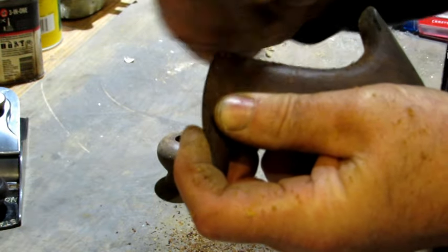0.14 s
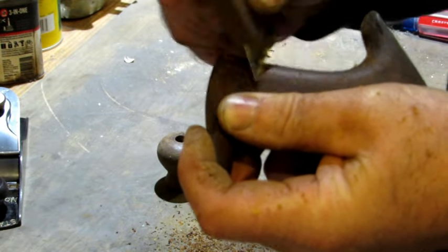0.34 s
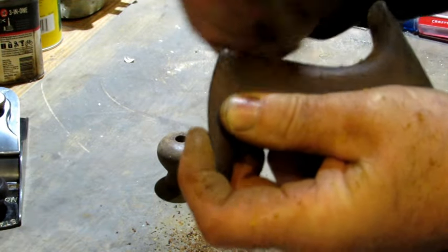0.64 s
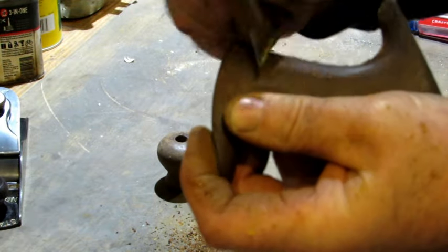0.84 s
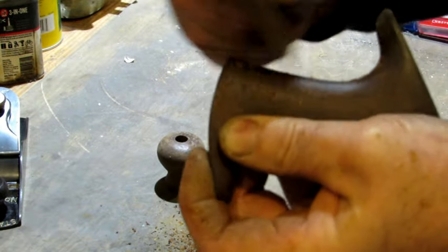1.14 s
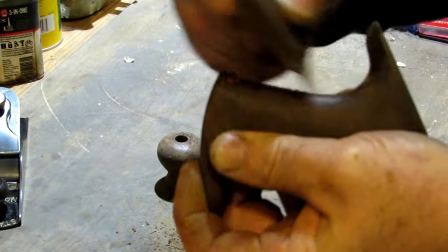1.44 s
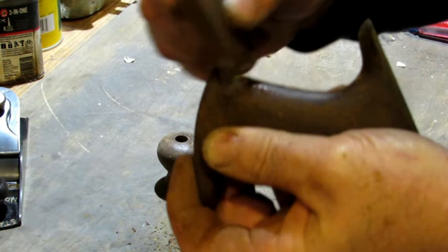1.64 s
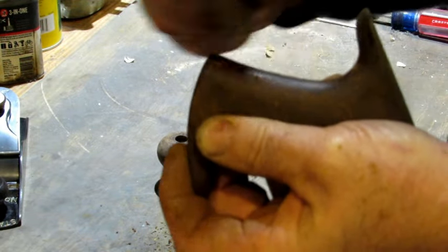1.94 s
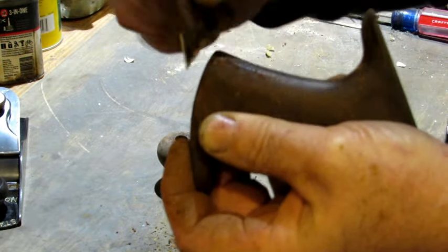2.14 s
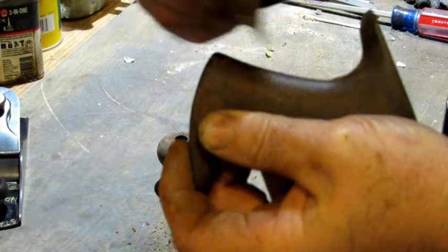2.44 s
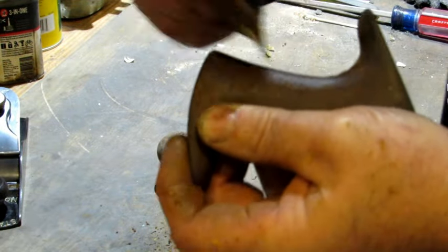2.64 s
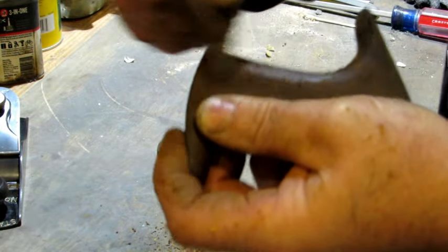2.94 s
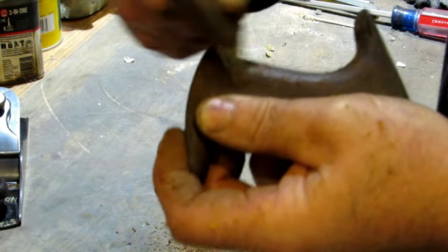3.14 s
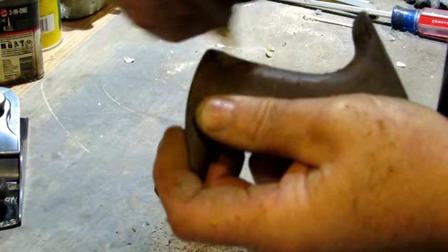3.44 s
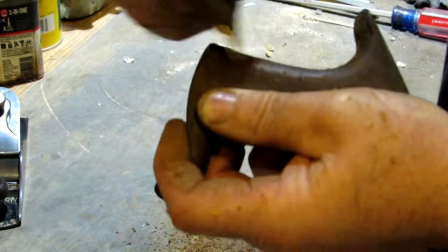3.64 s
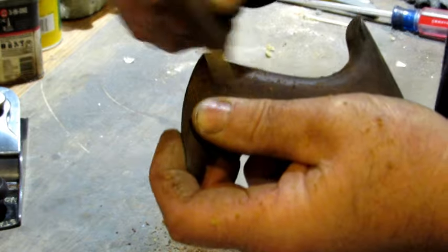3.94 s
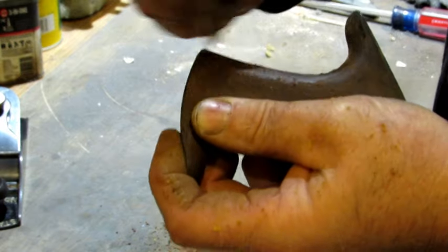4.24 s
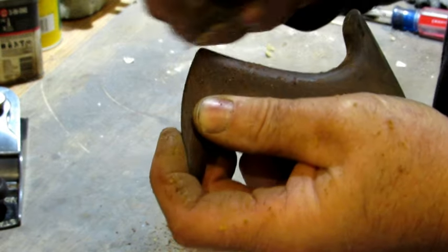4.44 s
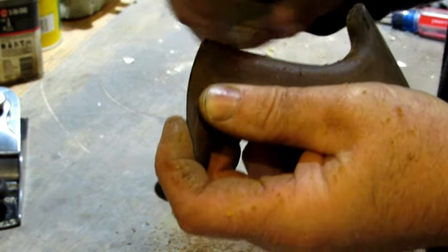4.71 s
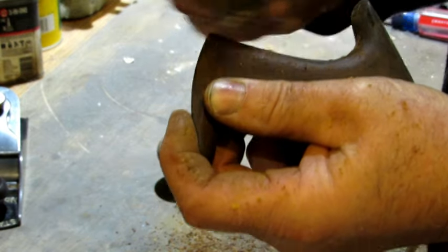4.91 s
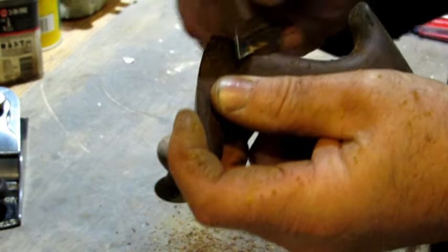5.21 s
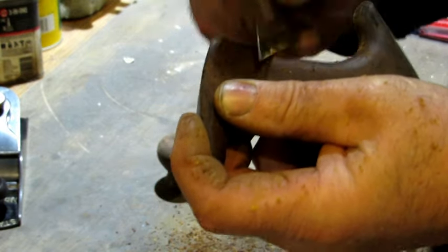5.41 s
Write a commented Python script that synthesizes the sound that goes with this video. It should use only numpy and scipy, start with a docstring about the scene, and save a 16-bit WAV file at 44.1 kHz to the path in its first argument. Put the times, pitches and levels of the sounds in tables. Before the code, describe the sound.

Close stereo view of a small steel blade scraping a wooden handle held in the hand. A scrape opens at once, then each stroke begins with a light woody tap, a faint drag and a gritty rasp that swells and stops. Strokes come about four a second, later nearly five and shorter. Steady bass-heavy room noise and a short workshop tail surround them.

```python
"""A small steel blade scrapes finish off a hand-held wooden handle, heard close by in a workshop.
Steady, wide room noise, heaviest in the bass, runs throughout. The first scraping stroke opens the scene.
Before each later stroke the blade lands with a tap and its quick echo off the bench: short forces excite
modes of wood and steel. Then the edge drags, bites and tears chips: tiny random slips swell and ring blade
and wood, and at times it catches with a click. The shop answers strokes and taps with a short diffuse tail."""
import sys
import numpy as np
from scipy import signal
from scipy.fft import rfft, irfft, next_fast_len
from scipy.io import wavfile
from scipy.ndimage import uniform_filter1d, map_coordinates

SR = 44100
rng = np.random.default_rng(int(sys.argv[2]) if len(sys.argv) > 2 else 0)


def digitize_waveform(pressure):
    """Quantize a signal to 16-bit integers and store it at the path in sys.argv[1].

    Rows of a 2-D input are taken as channels; values are limited to [-1, 1].
    """
    field = np.atleast_2d(pressure).T
    bounded = np.clip(field, -1, 1)
    quanta = np.round(bounded * 32767).astype(np.int16)
    wavfile.write(sys.argv[1], SR, quanta)


N = 245548

# Resonances of the wooden handle and the steel blade; BLADE rows 0-4 are its body, the rest its edge.
# Both: (frequency [Hz], width [Hz], relative level scraped [dB], relative level tapped [dB])
HANDLE_MODES = [(517, 96, -12, -17), (637, 40.4, -7, 3), (767, 44.6, -4, 2.5), (864, 42, -2, 8),
                (979, 107, -5, 7.5), (1148, 65, -2.5, -8), (1374, 99, -1.5, 2.5), (1702, 166, 4, 7),
                (2024, 227, 4, 13), (2038, 102, 1, -9), (2325, 220, 0.5, 1.5), (2426, 148, 4, 5),
                (2854, 380, -4, 11), (3287, 90, 4.5, 18), (3910, 790, -1, -31)]
BLADE_MODES = [(4860, 500, -14, 7), (5550, 1620, -2, -43), (6570, 1010, 1.5, 7), (7670, 1000, 1.5, 9),
               (8420, 680, 1, -1), (7980, 290, -12, -55), (9180, 850, -6, 10.5), (10313, 990, 5, 16.5),
               (10320, 750, 1, -1), (12230, 1100, -5.5, 11.5), (14800, 490, -9, -45.5)]
# The flexed blade sings while it cuts: (frequency [Hz], width [Hz], level [dB])
SQUEAL_MODE = [(2568, 93, 0)]
# Scraping strokes: (end of bite [s], time to peak [s], length from bite to lift-off [s],
#   drag, bite under the peak [dB], peak hiss [dB], start of lift-off under the peak [dB];
#   against the peak: blade body [dB], hollow wood [dB], step of hollow wood at the peak [dB],
#   stiff wood [dB], squeal [dB])
STROKES = [(0.02, 0.04, 0.09, -15, -7.5, -20.5, -7, -2.0, -12, 7, -11.5, -23),
           (0.289, 0.055, 0.092, -28.5, -7.0, -19.5, -10.5, -5.5, -15, 7, -15, -23),
           (0.535, 0.058, 0.097, -26, -8.5, -20.5, -15, -4, -15, 3.5, -12.5, -19),
           (0.766, 0.049, 0.097, -29, -12, -20.5, -10, -1.5, -18, -3.5, -13.5, -22),
           (1.029, 0.028, 0.08, -16, -12.5, -24, -8.5, -1.5, -16.5, 2, -10, -14),
           (1.258, 0.058, 0.11, -34, -10.5, -26, -6, -3.0, -13.5, 2.5, -10.5, -19),
           (1.544, 0.045, 0.094, -23, -11, -23.5, -12, -3, -17.5, 0.5, -15, -17.5),
           (1.796, 0.052, 0.1, -28, -8.5, -25, -5.5, -2, -14.5, 1, -12.0, -19),
           (2.07, 0.036, 0.082, -16, -9.5, -28.5, -0.5, -3, -7.5, 3, -9, -19),
           (2.319, 0.033, 0.084, -31, -7, -28.0, -6, -6, -11.0, 1.5, -9, -15),
           (2.538, 0.035, 0.069, -17, -15.5, -22, -10.5, -5.5, -18.5, -7, -11.0, -17),
           (2.748, 0.03, 0.06, -20, -9, -20, -8.5, -8.0, -21.5, -7, -12.0, -13),
           (2.954, 0.018, 0.041, -16.5, -12.5, -15, -12.5, -4.5, -22.5, -7, -16.5, -16),
           (3.162, 0.028, 0.066, -19, -9.5, -21.5, -12.5, -4, -16.5, -5, -13.5, -17.5),
           (3.372, 0.026, 0.049, -20, -0.5, -24.0, -7.0, -4.5, -15.5, -2, -11.5, -19),
           (3.559, 0.015, 0.056, -32, -3, -24.5, -5.5, -5, -15, -0.5, -13.5, -15),
           (3.76, 0.025, 0.045, -28, -3.5, -28.5, 0, -8.5, -13.5, -5, -8.5, -15),
           (3.947, 0.062, 0.054, -32, -4.0, -26.5, -5.0, -5.0, -10, -2.5, -7.5, -12.5),
           (4.151, 0.018, 0.058, -24, -15, -24, -7.5, -8.5, -15.5, -1, -15.5, -16),
           (4.367, 0.041, 0.063, -40, -2, -26.0, -4.5, -6.0, -15.5, -2, -13.5, -15),
           (4.583, 0.024, 0.062, -24, -12, -24, -6.5, -4.5, -14.5, -3, -15, -13.5),
           (4.796, 0.016, 0.061, -35, -8, -27, -5.0, -7.5, -14.0, 3, -13.5, -10.0),
           (5.008, 0.021, 0.064, -29, -14, -28, -5, -1.5, -13, -1, -11.5, -16.0),
           (5.236, 0.021, 0.06, -28, -3.5, -32.5, -4.0, 0, -12, 0, -10, -16.0),
           (5.459, 0.044, 0.059, -23, -6, -23, -8.5, -4.5, -17.5, -2, -13.5, -19.0)]
LEAD_S, BITE_S, LIFT_S = 0.033, 0.0056, 0.015  # light drag before the bite, the bite, the lift-off
LIFT_DB = -17.5  # fall during the lift-off
BODY_RISE_DB, STIFF_RISE_DB, SQUEAL_RISE_DB = 6.5, -1, -2  # change of each voice from bite to lift
WOOD_FOLLOWS = 0.26  # the wood swings by this share of the hiss's dB
DIG_S = 0.0064  # the edge digs deeper or rides up after the peak: the hollow wood changes within this time


def scrape():
    """Friction excitation: while the edge is on the wood, its slips drive the modes of edge, blade and handle."""
    t = np.arange(N) / SR
    gains = np.zeros((5, N))
    for (s, rise_s, length_s, drag_db, bite_db, peak_db, lift_db,
         body_db, hollow_db, hollow_rise_db, stiff_db, squeal_db) in STROKES:
        start = s - BITE_S - LEAD_S
        lift = s + length_s
        end = lift + LIFT_S
        on = (t >= start) & (t < end + .02)
        now = t[on]
        swing_db = np.interp(now, [s - BITE_S, s, s + min(rise_s, length_s), lift, end],
                             [drag_db, bite_db, 0, lift_db, lift_db + LIFT_DB])
        lifting_db = np.interp(now, [lift, end], [0, LIFT_DB])
        contact = np.interp(now, [start, start + 0.03, end, end + .011], [0, 1, 1, 0]) ** 2
        way = np.clip((now - s) / length_s, 0, 1) - .5  # progress along the handle
        dig = np.clip((now - s - rise_s) / DIG_S, 0, 1) - .5
        wood_db = WOOD_FOLLOWS * (swing_db - lifting_db) + lifting_db
        voices_db = np.array([
            swing_db,
            swing_db + body_db + BODY_RISE_DB * way,
            wood_db + hollow_db + hollow_rise_db * dig,
            wood_db + stiff_db + STIFF_RISE_DB * way,
            (swing_db + wood_db) / 2 + squeal_db + SQUEAL_RISE_DB * way])
        gains[:, on] = contact * amp(peak_db + voices_db)
    edge, body, hollow, stiff, squeal = gains
    fine = slips(share=0.53, size_db=-0.5, chatter_db=-0.5, patchy_db=3.5)
    coarse = slips(share=0.22, size_db=2, chatter_db=1.37, patchy_db=2.5)  # torn fibres shake the handle
    # neighbouring modes move in opposite phase, so no hole opens between the groups
    steel = ring(fine * body, BLADE_MODES[:5]) - ring(fine * edge, BLADE_MODES[5:])
    wood = ring(coarse * hollow, HANDLE_MODES[:7]) - ring(coarse * stiff, HANDLE_MODES[7:])
    return steel + wood + ring(coarse * squeal, SQUEAL_MODE)


def slips(share, size_db, chatter_db, patchy_db):
    """Random impulse process: slips on a share of samples, of mixed size, in clumps and drifting patches of colour."""
    hit = rng.random(N) < share
    size = amp(size_db * rng.exponential(size=N)) * rng.standard_normal(N)
    clumped = hit * size * amp(chatter_db * wobble(250))
    z = signal.stft(clumped, nperseg=256)[2]
    field = uniform_filter1d(rng.standard_normal(z.shape), 5, 0)  # smooth over frequency
    field = uniform_filter1d(field, 6, 1)  # smooth over time
    coloured = signal.istft(z * amp(patchy_db * unit(field)), nperseg=256)[1]
    return unit(coloured[:N])


def ring(push, table):
    """Modal filtering: a push passes through a body's modes, scaled to equal power out for a white push."""
    response = modes([row[:3] for row in table])
    power = np.mean(np.abs(response(np.linspace(0, SR / 2, num=2000))) ** 2)
    return filtered(push, response) / np.sqrt(power)


# Landings of the blade: (time [s], strength [dB], handle's lower [dB], upper [dB] and top modes [dB],
#   steel [dB], echo [dB])
TAPS = [(0.248, 4, -38, 9, -4, -13, -5), (0.506, 5.5, -6, 19, 6, -6, -5.5),
        (0.726, 3.5, -40, 5, 0, -8.5, -3.5), (0.984, 0.5, -9, 1, -14, -2.5, -18),
        (1.234, 3, -8, 12.5, 2.5, -12, -13.5), (1.497, 1.5, -8, 5, 2, -8, -6),
        (1.742, -0.5, -16, 7, -20, -11, 3.5), (2.047, 2, -1, -4, -3, -2, -31),
        (2.296, -1.5, -5, -16, -2, -1, -18), (2.514, 2.5, -5, -16, 6, -1, -11),
        (2.707, 1, 0, -13, 2, -1.5, -5.5), (2.913, -3.5, 6, -32, -17, -1.5, -19),
        (3.128, -3.5, 10, -28, -9, -3, -3), (3.33, 2.5, 2, 3.5, -3, -4, -4),
        (3.525, 1.5, 7, -2, -1, -5, -11), (3.721, -1.5, 6, -18, -16, -2.5, -8.5),
        (3.907, -0.5, 6, -5, -3, 0.5, -5), (4.122, 2.5, 1, -25, -12, 0.5, -8.5),
        (4.325, 0, -9, 5, -44, -4.5, -1), (4.558, -0.5, 2, 10, -22, -0.5, 1.5),
        (4.764, 2, -2, 7, -22, -2.5, -6.5), (4.984, 2, 8, 10, -6, -3, -5.5), (5.2, 0, 6, 3, -7, -2.5, -3.5),
        (5.435, 4, 8, 3, 5, -2.5, -7)]
DEEP_DB, CRACK_DB = -12, -4  # every landing: handle near 900 Hz, steel near 4.6 kHz


def taps():
    """Impact and early reflection: the blade lands and the bench echoes it; the spot decides which modes speak."""
    out = np.zeros(N + SR)
    for s, db, lower_db, upper_db, top_db, steel_db, echo_db in TAPS:
        spot = [(900, DEEP_DB), (1500, lower_db), (2000, 0), (2450, upper_db), (3200, top_db)]
        for delay_s, level_db, grit in (.0003, 0.025, 1), (.0042, echo_db, 0.98):
            wood = blow(HANDLE_MODES, spot, contact_s=.0002, grit=grit)
            steel = blow(BLADE_MODES, [(4650, CRACK_DB), (6400, 0)], contact_s=.00005, grit=1.5 * grit)
            at = round((s + delay_s) * SR)
            out[at:][:1500] += amp(db + level_db) * (wood + amp(steel_db) * steel)
    return out[:N]


# The edge digs in: (time [s], strength [dB], handle's upper modes [dB])
CATCHES = [(0.068, -9, -10), (0.072, -8, -8), (0.075, -10, -8), (0.081, -15, -17), (0.085, -11, -5),
           (0.353, -5, -20), (0.36, -11, -9), (0.584, -23, -20), (0.624, -29, -9), (0.857, -13, -17),
           (1.329, -42, -7), (1.6, -10, -4), (1.869, -16, -17), (2.113, -29, -7), (2.129, -31, -9),
           (2.761, -15, -9), (2.948, -23, -6), (3.375, -28, -3), (3.566, -27, -9), (3.947, -23, -12),
           (4.374, -30, -11), (5.471, -16, -2)]


def catches():
    """Impulsive excitation: the edge digs in and knocks the handle's modes."""
    out = np.zeros(N + SR)
    for s, db, thin_db in CATCHES:
        knock = blow(HANDLE_MODES, [(900, 1.5), (2500, thin_db)], contact_s=0.00019, grit=0.75)
        out[round(s * SR):][:1500] += amp(db) * knock
    return out[:N]


def blow(table, colour, contact_s, grit):
    """Contact-time low-pass: a brief press and a decaying skitter drive slightly scattered modes, at equal energy."""
    t = np.arange(1500) / SR
    press = np.sin(np.pi * np.clip(t / contact_s, 0, 1))  # a longer contact leaves the high modes out
    skitter_level = grit * np.exp(-t / 0.00063) + amp(-9.0) * np.exp(-t / 0.0085)
    skitter = rng.standard_normal(1500) * skitter_level
    push = np.convolve(skitter, press[:12] / press.sum())[:1500] + press
    scatter_db = 2 * rng.standard_normal(len(table))
    tapped = [(c, w, db + along(colour, c) + d) for (c, w, _, db), d in zip(table, scatter_db)]
    body = modes(tapped, ratio=0.87)  # in step, each row scaled down against the last
    # a small body radiates no bass
    y = filtered(push, lambda f: body(f) * (1j * f / (450 + 1j * f)) ** 2)
    return 8.5 * y / np.linalg.norm(y) / np.sqrt(SR / 1000)


# Stereo width, side filter against middle: (frequency [Hz], gain [dB])
WIDTH = [(300, -6.5), (700, -11.5), (1500, -12), (3000, -19), (6000, -13), (10000, -3.5), (15000, -5.5)]


def spread(middle, side):
    """Sum and difference stereo: the two ports share the middle and differ by the phase-turned side."""
    side = filtered(side, lambda hz: 1j * amp(along(WIDTH, hz)))
    return np.array([middle + side, middle - side])


# Reverberation time of the shop: (frequency [Hz], time to fall by 60 dB [s])
SHOP_T60 = [(300, 0.55), (1000, 0.5), (3000, 0.47), (8000, 0.29), (14000, 0.21)]


def shop(x):
    """Diffuse reverberation: noise tails decay at a speed set by frequency, redrawn every quarter second."""
    out = np.zeros((2, N + SR))
    step = SR // 4
    for start in range(0, N, step):
        hz, t, z = signal.stft(rng.standard_normal((2, SR // 2)), SR, nperseg=256)
        decay = amp(-60 * t / along(SHOP_T60, hz)[:, None])
        tail = signal.istft(z * decay, SR, nperseg=256)[1]
        wet = signal.fftconvolve(x[None, start:start + step], tail / np.linalg.norm(tail[0]), axes=1)
        late = start + 90  # the tail begins 90 samples (2 ms) late
        out[:, late:late + wet.shape[1]] += wet
    mid, side = out[:, :N]
    side = filtered(side, lambda hz: amp(along(WIDTH, hz) + 5.5))
    return np.array([mid + side, mid - side])


# Spectra of the room noise, both: (frequency [Hz], relative level [dB])
AIR_MID = [(20, -24), (60, -4.5), (150, -6), (400, -0.5), (1000, -2), (3000, -17), (8000, -15.5),
           (15000, -24)]
AIR_SIDE = [(20, 11), (60, 5), (150, 10.5), (400, 8.5), (1000, 0.5), (3000, -9), (8000, -13), (15000, -26)]


def air():
    """Stationary filtered noise: the side outweighs the middle, so the bass is mostly in opposite phase."""
    white = rng.standard_normal((2, N))
    mid, side = filtered(white, lambda hz: amp([along(AIR_MID, hz), along(AIR_SIDE, hz)]))
    return amp(-39.5) * np.array([mid + side, mid - side])


def modes(table, ratio=-1):
    """Modal superposition: causal resonances summed, each row times ratio against the last (-1 alternates phase)."""
    def response(f):
        return sum(ratio ** k * amp(db) * 1j * f * w / (c * c - f * f + 1j * f * w)
                   for k, (c, w, db) in enumerate(table))
    return response


def filtered(x, response):
    """Linear filtering: the spectrum of x times a complex response of frequency."""
    m = next_fast_len(x.shape[-1] + 8192)
    return irfft(rfft(x, m) * response(np.fft.rfftfreq(m, 1 / SR)), m)[..., :x.shape[-1]]


def wobble(rate):
    """Band-limited randomness: a smooth curve through random knots, rate of them a second."""
    knots = rng.standard_normal(int(N * rate / SR) + 4)
    return map_coordinates(knots, [np.arange(N) * rate / SR])


def along(points, hz):
    """Logarithmic frequency scale: (Hz, value) points interpolated on a log axis."""
    f, v = np.transpose(points)
    return np.interp(np.log(hz + 1), np.log(f + 1), v)


def amp(db):
    """Level law: decibels to an amplitude ratio."""
    return 10 ** (np.asarray(db) / 20)


def unit(x):
    """Power normalisation: x at an RMS of one."""
    return x / np.sqrt(np.mean(x ** 2) + 1e-20)


def scene():
    """Superposition: near scraping and knocks in stereo, the shop's answer and the room noise add up."""
    rub = scrape()
    knock = taps() + catches()
    unlike = .5 * rub + 0.83 * scrape()  # each port hears partly its own slips along the edge
    near = spread(rub + knock, unlike + 1.13 * knock)
    return near + shop(amp(-8) * rub + amp(-9.0) * knock) + air()


# Response of the microphone: (frequency [Hz], gain [dB])
MIC = [(20, -3.5), (12000, 0), (14000, -6), (14700, -14), (15200, -19), (15600, -26), (16800, -40)]
# Narrow notches near 4 and 8 kHz: (frequency [Hz], width [Hz], depth [0-1])
NOTCHES = [(3963, 870, 0.86), (8044, 310, 1)]
TOP_HZ = 16860  # band limit


def record(dry):
    """Frequency response: the microphone dulls the top, two narrow notches thin the sound, a band limit ends it."""
    def colour(f):
        holes = np.prod([1 - np.clip(d, 0, 1) * 1j * f * w / (c * c - f * f + 1j * f * w)
                         for c, w, d in NOTCHES], axis=0)
        return amp(along(MIC, f)) * holes * (f < TOP_HZ)
    balance = amp([[-.15], [.15]])  # first and second channel
    return filtered(dry * balance, colour)


dry = scene()
out = record(dry)
digitize_waveform(out)
```